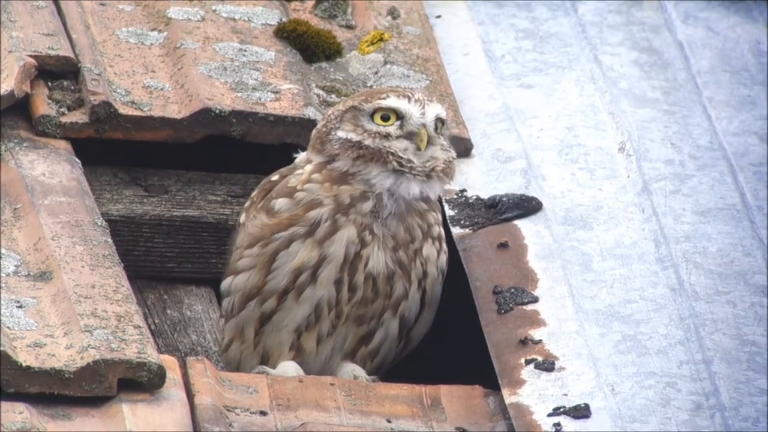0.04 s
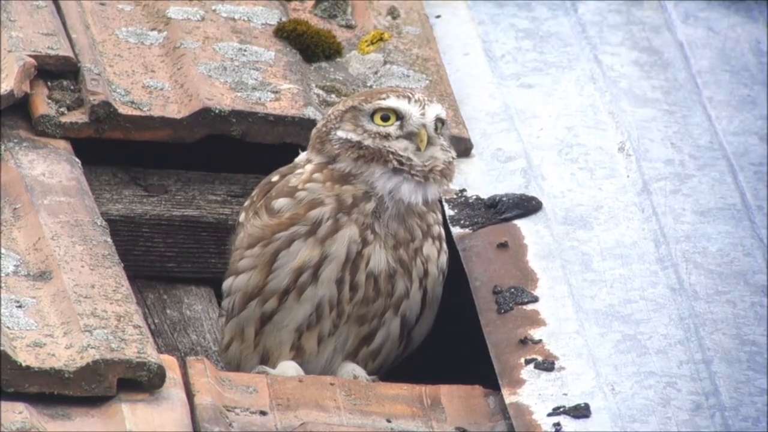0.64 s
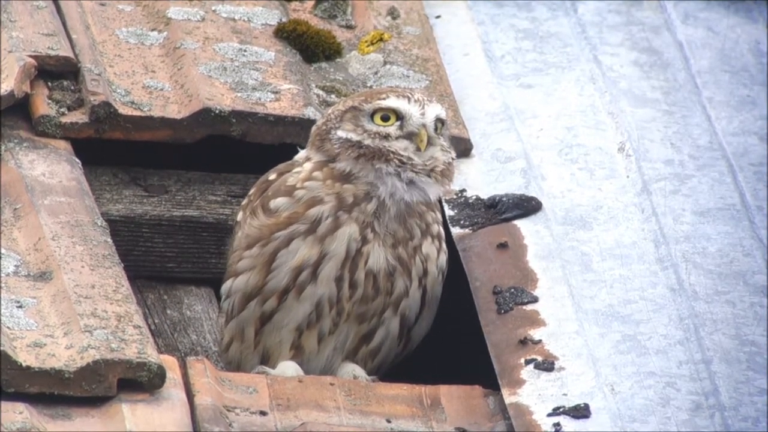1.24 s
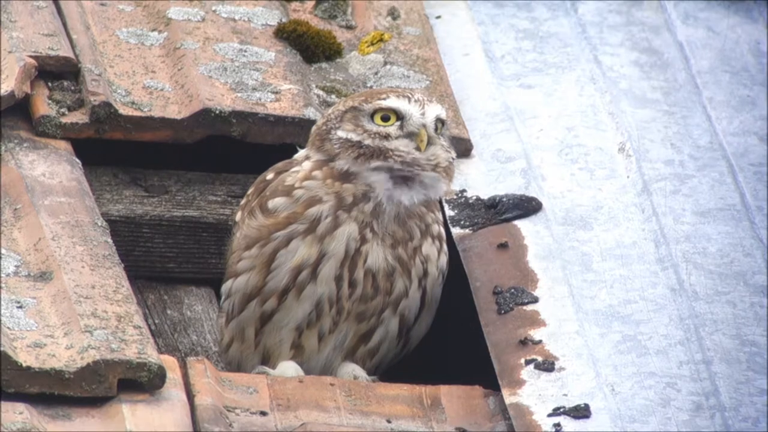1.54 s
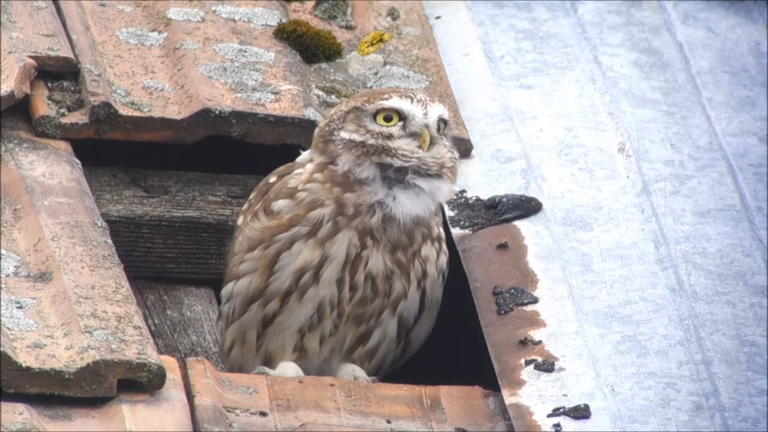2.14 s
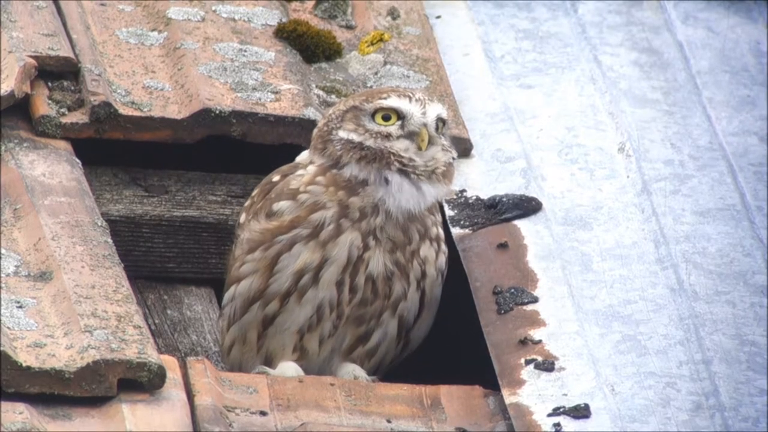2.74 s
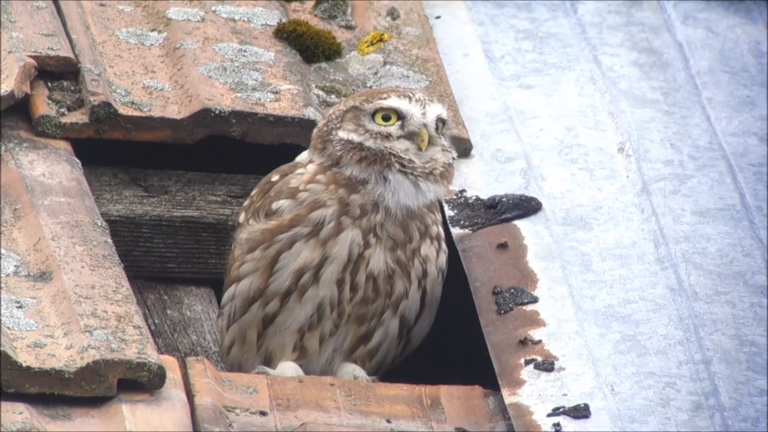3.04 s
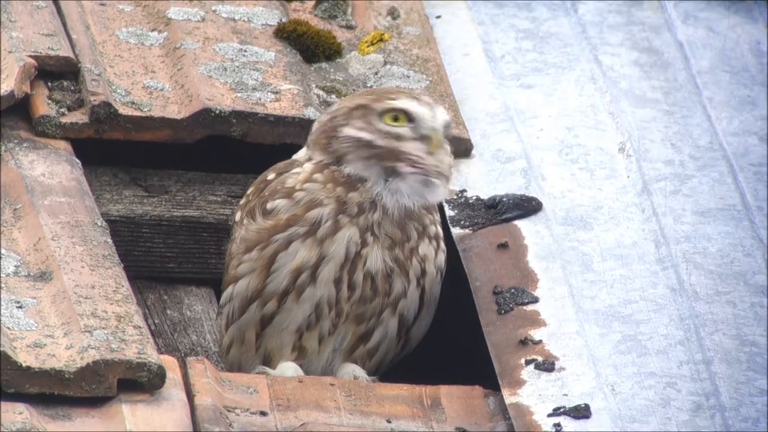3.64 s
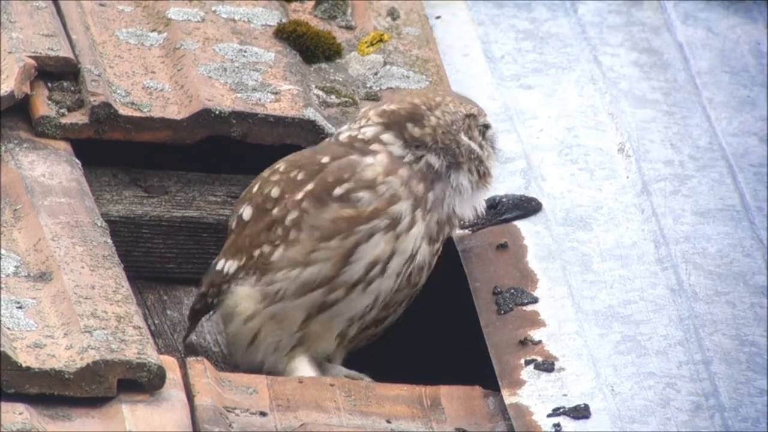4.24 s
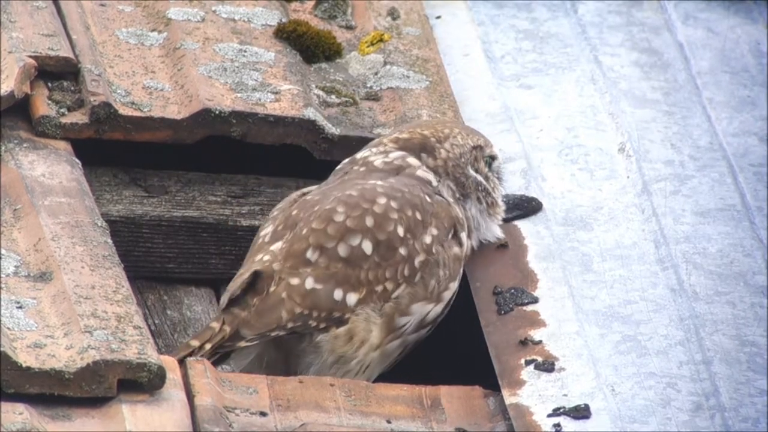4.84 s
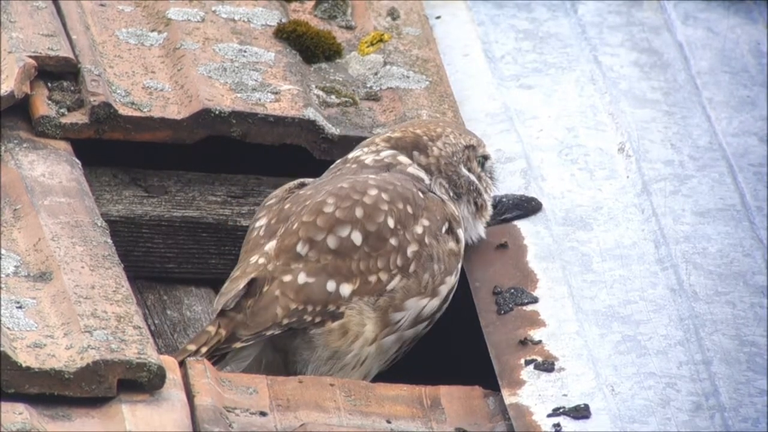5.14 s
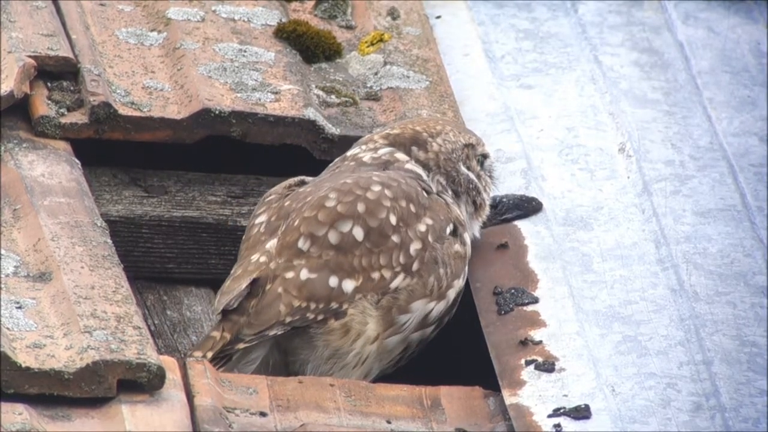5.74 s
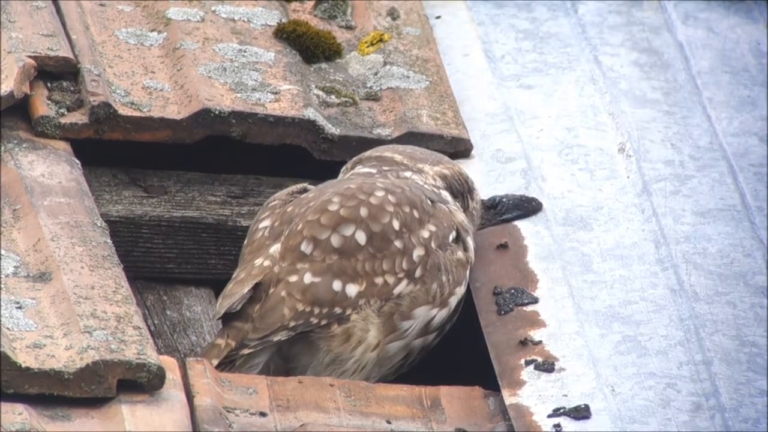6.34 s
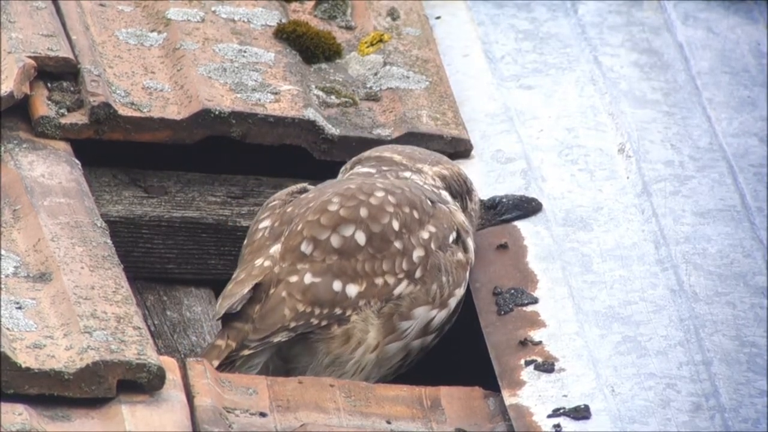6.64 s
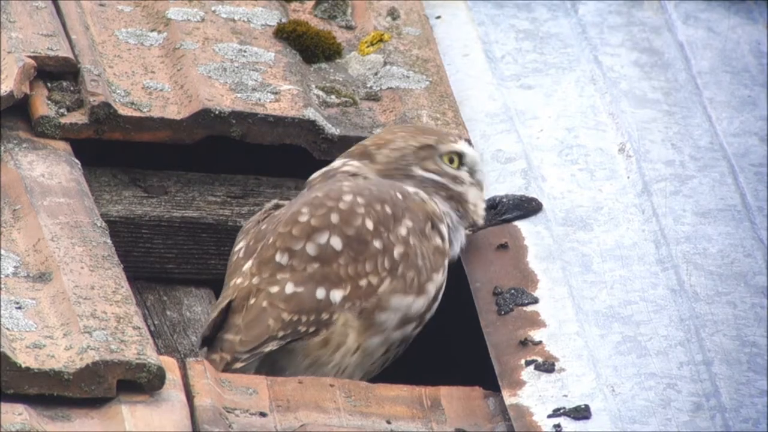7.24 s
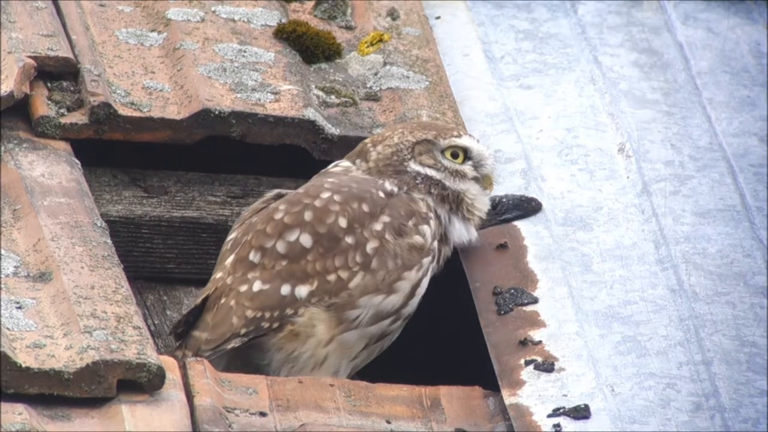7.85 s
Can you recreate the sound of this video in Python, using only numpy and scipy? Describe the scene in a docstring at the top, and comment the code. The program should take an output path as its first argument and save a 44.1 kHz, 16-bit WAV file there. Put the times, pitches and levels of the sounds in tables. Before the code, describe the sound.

Light wind and a soft open-air hiss fill a farmyard, with gusts bumping gently against the stereo microphone. After a brief distant chirp, a nearby little owl hoots three times, a couple of seconds apart, each clear call sliding upward and leaving a short echo. Its feathers rustle faintly during the second and loudest call, and a distant songbird's quick, raspy whistles overlap the third.

```python
"""A farmyard in light wind, heard on a stereo microphone. Close by on a tiled roof, a little owl gives
three drawn-out, rising hoots: nearly pure syrinx tones whose overtones are shaped by its throat and
which echo between the buildings. Farther off, a small songbird chatters in quick, sliding whistles.
Gusts rumble over a steady outdoor hiss, and now and then an eddy buffets the microphone."""
import sys
import numpy as np
from scipy import signal
from scipy.fft import rfft, irfft
from scipy.io import wavfile

SR = 44100
rng = np.random.default_rng(int(sys.argv[2]) if len(sys.argv) > 2 else 0)


def materialize(psi):
    """Save the field psi as 16-bit PCM at rate SR to the path in sys.argv[1].

    A 1-D psi becomes a single channel; in a 2-D psi each row is a channel.
    """
    bounded = np.clip(np.atleast_2d(psi).T, -1, 1)
    quanta = np.round(bounded * 32767).astype(np.int16)
    wavfile.write(sys.argv[1], SR, quanta)


N = 356769


def from_db(db):
    """Decibels to gain."""
    return 10 ** (np.asarray(db) / 20)


def pan(db):
    """Gains that raise the left channel and lower the right by db; negative leans right."""
    return from_db([[db], [-db]])


def rms_one(x):
    """Scale to unit power."""
    return x / np.sqrt(np.mean(x ** 2) + 1e-20)


def in_time(rows):
    """Each column of a curve at every sample."""
    times, *columns = np.transpose(rows)
    return [np.interp(np.arange(N) / SR, times, column) for column in columns]


def at_hz(points, hz):
    """Read a spectrum on a log-frequency axis."""
    known_hz, values = np.transpose(points)
    return np.interp(np.log(hz + 1e-3), np.log(known_hz), values)


def bandpass(x, band_hz, order):
    """Keep the band between two frequencies."""
    return signal.sosfilt(signal.butter(order, band_hz, "band", fs=SR, output="sos"), x)


def drift(rate_hz):
    """Random motion of spread 1, mostly slower than rate_hz."""
    hop, settle = 40, 2000
    pole = np.exp(-2 * np.pi * rate_hz * hop / SR)
    noise = rng.standard_normal(N // hop + settle + 2)
    slow = signal.lfilter([1], [1, -2 * pole, pole * pole], noise)[settle:]
    return np.interp(np.arange(N) / hop, np.arange(len(slow)), rms_one(slow))


def swells(rows):
    """Gain of bell-shaped swells."""
    t = np.arange(N) / SR
    return sum(from_db(db) * np.exp(-(2 * (t - centre) / length) ** 2) for centre, length, db in rows)


def stereo_noise(spectrum):
    """Coloured noise of unit power, alike in both channels in the bass and diffuse in the treble."""
    # likeness of left and right: f/Hz, correlation
    likeness = [(30, 0.99), (70, 1), (170, 0.89), (350, 0.5), (700, 0.38), (1500, 0), (3000, 0), (6000, 0),
                (14000, 0)]
    hz = np.arange(N // 2 + 1) * SR / N
    mid, side = rfft(rng.standard_normal((2, N)))
    alike = np.clip(at_hz(likeness, hz), -1, 1)
    both = np.sqrt(1 + alike) * mid + np.sqrt(1 - alike) * side * [[1], [-1]]
    return rms_one(irfft(both * from_db(at_hz(spectrum, hz)), N))


def hiss(level_db=-56):
    """Steady open-air hiss from all round."""
    # hiss spectrum: f/Hz, relative level/dB
    spectrum = [(250, -10.5), (420, -10.5), (600, -9.5), (730, -6), (900, -11), (1080, -8.5), (1800, -10),
                (2300, -8), (2750, -12.5), (3050, -11), (3500, -13), (8000, -20), (13000, -26.5),
                (15600, -42)]
    return from_db(level_db) * stereo_noise(spectrum)


def wind(rumble_db=-2.0, gust_db=1.84, rush_db=0.5):
    """Low gusts over a deep rumble, a soft rush, and eddies that thud on the microphone."""
    # spectra of the four layers: f/Hz, relative level/dB
    rumble_spectrum = [(20, 3.5), (36, -13), (54, 7.5), (75, 3.5), (110, -7.5), (200, -46)]
    gust_spectrum = [(60, -6), (110, 6.5), (175, 6.5), (240, -1), (330, -26.5)]
    rush_spectrum = [(150, -12), (250, 4.5), (330, -2), (480, -7), (640, -34)]
    eddy_spectrum = [(20, -0.5), (36, -8), (54, 9.5), (75, 2), (110, -11), (200, -37)]
    # wind strength before each layer's gain: t/s, gust level/dB, rush level/dB
    strength = [(0, -63, -67), (.5, -63.5, -67), (1.2, -65.5, -67), (2.4, -67.5, -68), (3.7, -68, -75),
                (4.1, -63, -71), (4.5, -63, -66.5), (4.95, -66.5, -70.5), (5.5, -66, -73.5),
                (5.7, -60.5, -72), (6, -64.5, -65.5), (6.6, -61, -68), (7.05, -67.5, -67), (7.5, -63, -60),
                (8.09, -71, -64)]
    # eddies striking the microphone: t/s, length/s, level/dB
    buffets = [(.18, .12, -65), (.76, .22, -59.5), (1.32, .3, -59.5), (1.62, 0.088, -52),
               (1.77, 0.098, -58), (2.04, 0.17, -58.5), (2.29, 0.23, -54), (5.57, 0.084, -53.5),
               (5.69, 0.12, -59), (5.84, 0.12, -56.5), (6.2, 0.31, -60), (7.14, .1, -57),
               (7.42, 0.089, -62), (7.68, 0.074, -64)]
    gust_curve, rush_curve = in_time(strength)
    rumble = from_db(gust_curve + rumble_db + 2.0 * drift(5)) * stereo_noise(rumble_spectrum)
    gusts = from_db(gust_curve + gust_db + 1.7 * drift(8)) * stereo_noise(gust_spectrum)
    rush = from_db(rush_curve + rush_db) * stereo_noise(rush_spectrum)
    eddies = swells(buffets) * stereo_noise(eddy_spectrum)
    return rumble + gusts + rush + eddies


def yard(x, t60_s=0.76, build_s=0.0013, dull_hz=6000):
    """Diffuse scatter from roofs, walls and trees, different in each channel."""
    t = np.arange(int(1.2 * SR)) / SR
    tail = rng.standard_normal((2, len(t))) * from_db(-60 * t / t60_s) * (1 - np.exp(-t / build_s))
    tail = signal.sosfilt(signal.butter(1, dull_hz, fs=SR, output="sos"), tail)
    tail /= np.sqrt(np.sum(tail ** 2, axis=1, keepdims=True))
    return signal.fftconvolve(x[None], tail, axes=1)[:, :N]


def wall_echo(x):
    """A distinct return from the nearest building."""
    # wall reflection: delay/s, left level/dB, right level/dB
    echoes = [(.047, -24, -23)]
    t = np.arange(N) / SR
    return sum(from_db([[left], [right]]) * np.interp(t - delay, t, x, left=0)
               for delay, left, right in echoes)


def stirred(x, depth=.8, rate_hz=45):
    """Moving air and leaves make the scattered sound flutter, each channel in its own way."""
    flutter = np.array([drift(rate_hz), drift(rate_hz)])
    return x * (1 + depth * flutter) / np.sqrt(1 + depth ** 2)


def fading_hoot(level_db=-61, octave_db=-7, band_hz=(790, 880), t60_s=2.0):
    """At the start, the last scatter of an earlier hoot, fundamental and octave, dies away."""
    tone, octave = (rms_one(bandpass(rng.standard_normal((2, N)), k * np.array(band_hz), order=2))
                    for k in (1, 2))
    decay = from_db(level_db - 60 * np.arange(N) / SR / t60_s)
    return (tone + from_db(octave_db) * octave) * decay


def songbird(rasp=0.0289, flutter_db=3.5, buzz=.5, edge_s=0.003, direct_db=-2.0, yard_db=-2.5):
    """Raspy whistles, each bent through three pitches, far enough off to lie deep in the scatter."""
    # notes: t/s, length/s, first f/Hz, middle f/Hz, last f/Hz, relative level/dB
    notes = [ (0.000, 0.024, 3610, 3950, 4520, -48), (0.004, 0.037, 3210, 3350, 3070, -56),
             (0.021, 0.0347, 3540, 3710, 3620, -48.5), (0.055, 0.022, 3665, 3640, 3660, -58),
             (2.935, 0.023, 4840, 5530, 4600, -61), (2.961, 0.029, 4230, 3750, 3650, -56.5),
             (4.041, 0.033, 5000, 5180, 4100, -59), (4.108, .023, 4020, 4420, 3770, -57.5),
             (4.569, 0.037, 2350, 2175, 1750, -52), (5.374, 0.037, 4280, 4220, 3830, -59),
             (6.999, .018, 6140, 5300, 4350, -56), (7.015, 0.055, 4500, 3670, 5040, -48),
             (7.053, 0.034, 4690, 5550, 5260, -57), (7.072, 0.038, 4520, 3804, 4050, -48),
             (7.087, .022, 5930, 5100, 4400, -56), (7.108, .045, 4184, 3880, 5140, -45.5),
             (7.155, .030, 5460, 4000, 3600, -44.5), (7.193, 0.0196, 5750, 5750, 5200, -53),
             (7.195, .030, 3520, 3700, 4600, -53), (7.281, .025, 5940, 5400, 4270, -51.5),
             (7.311, 0.0376, 3905, 3303, 3460, -43.5), (7.345, .042, 3210, 3500, 4560, -46.5),
             (7.384, 0.018, 4440, 4350, 3900, -50), (7.403, 0.0233, 3655, 3403, 3170, -40),
             (7.437, 0.037, 3420, 3700, 4260, -51), (7.464, .037, 4550, 4030, 3350, -49)]
    song = np.zeros(N)
    wobble = 1 + rasp * drift(290)
    # fast, uneven pulsing spreads a husky fringe around the whistle
    flutter = from_db(flutter_db * drift(110)) * (1 + buzz * drift(450))
    for start, length, first, middle, last, level_db in notes:
        t = np.arange(int(length * SR)) / SR
        at = int(start * SR) + np.arange(len(t))
        bend = np.polyfit([0, .5, 1], [first, middle, last], 2)
        pitch = np.polyval(bend, t / length) * wobble[at]
        swell = np.clip(np.minimum(t, length - t) / edge_s, 0, 1) * flutter[at]
        song[at] += from_db(level_db) * swell * np.sin(2 * np.pi * np.cumsum(pitch) / SR)
    return from_db(direct_db) * pan(-0.3) * song + from_db(yard_db) * yard(song)


def feathers():
    """A soft rustle as the owl turns and shuffles its wings."""
    # wing shuffle: t/s, length/s, level/dB
    shuffles = [(4.62, .1, -58)]
    # rustle spectrum: f/Hz, relative level/dB
    spectrum = [(200, -11), (400, -6), (700, -7), (2100, -3), (6000, -32)]
    return swells(shuffles) * stereo_noise(spectrum)


def throat(resonances, hz):
    """Strength that the owl's throat gives an overtone at this frequency."""
    return sum(from_db(db) / (1 + (2 * (hz - centre) / width) ** 2) for centre, width, db in resonances)


def overtones(resonances, pitch, phase, effort_db, on, flutter_db=1.4, usual_db=-34.5, follow=0.63):
    """Harmonics 3 to 9 light up as they climb through the throat's resonances, and grow with effort."""
    upper = sum(throat(resonances, k * pitch) * from_db(flutter_db * drift(45)[on]) * np.sin(k * phase)
                for k in range(3, 10))
    return upper * from_db(follow * (effort_db - usual_db))


def hoot(contour, resonances, jitter=0.0052, slack_jitter=0.049, shimmer_db=1.0, edge_s=0.0025):
    """A nearly pure syrinx tone that scoops up, climbs slowly and drops off; its overtones beam right."""
    scoop_s, scoop_hz, scoop_fade_db = .054, 299, 12
    drop_s, drop_hz, drop_fade_db = .036, 185, 28.5
    octave_flutter_db, octave_fade_db = 2.8, 11
    reed_db, slack_dull_db = -10, 5
    t = np.arange(N) / SR
    start, end = contour[0][0], contour[-1][0]
    gate = np.clip(np.minimum(t - start + scoop_s, end + drop_s - t) / edge_s, 0, 1)
    on = gate > 0
    # both are 0 through the held part and reach 1 at the hoot's outer ends
    scoop = np.maximum(start - t[on], 0) / scoop_s
    drop = np.maximum(t[on] - end, 0) / drop_s
    held_hz, held_db, octave_db = (curve[on] for curve in in_time(contour))
    pitch = held_hz - scoop_hz * scoop ** 2.2 - drop_hz * drop ** 2.2
    effort_db = held_db - scoop_fade_db * scoop ** 0.84 - drop_fade_db * drop ** 2.8
    # in the slides at both ends the slack membrane vibrates unevenly and turns reedy
    slack = np.minimum(2 * scoop ** 2 + 3 * drop ** 2, 1)
    wobble = 1 + (jitter + slack_jitter * slack) * drift(167)[on]
    phase = 2 * np.pi * np.cumsum(pitch * wobble) / SR
    reed = from_db(octave_db + reed_db) * np.minimum(2 * (scoop + drop), 1) * np.sin(3 * phase)
    tone = from_db(effort_db + shimmer_db * drift(62)[on]) * np.sin(phase)
    faded_octave_db = octave_db - octave_fade_db * (scoop ** 2 + drop)
    octave = from_db(faded_octave_db + octave_flutter_db * drift(25)[on]) * np.sin(2 * phase)
    upper = reed + from_db(-slack_dull_db * slack) * overtones(resonances, pitch, phase, effort_db, on)
    out = np.zeros((2, N))
    out[:, on] = np.sqrt(2) * gate[on] * (pan(-0.27) * tone + pan(-1.5) * octave + pan(-1.6) * upper)
    return out


def owl(gain_db=0.6, yard_db=-18.0, overtone_yard_db=-11.5, beam_hz=(1250, 3000)):
    """Three hoots from the roof; the overtones, aimed away over the yard, return more scatter."""
    # held part of each hoot, levels relative: t/s, f/Hz, tone level/dB, octave level/dB
    contours = [
        [(2.085, 776, -48.5, -52), (2.135, 797.5, -43.5, -56), (2.25, 796.6, -38.5, -56),
         (2.305, 810, -41, -62), (2.37, 816, -37.5, -57), (2.45, 829, -40, -58), (2.54, 841.5, -40, -59.5),
         (2.62, 850.3, -37.5, -48), (2.69, 867, -37, -51)],
        [(4.555, 793.4, -46, -50), (4.62, 800.4, -39, -49.5), (4.735, 811, -35.5, -56), (4.785, 827, -35, -45),
         (4.85, 839.7, -35.5, -44), (4.92, 857, -33.5, -54), (4.98, 877, -31.5, -47), (5.05, 879, -31, -46),
         (5.105, 870, -34.5, -49)],
        [(7.18, 823, -48.5, -60), (7.24, 825, -42, -53), (7.35, 819.4, -38, -52), (7.43, 844, -39.5, -48.5),
         (7.50, 837, -39, -62), (7.61, 847, -37, -58), (7.665, 850, -36.5, -48), (7.745, 879.6, -34, -42),
         (7.775, 873, -35.5, -49)],
    ]
    # throat resonances for each hoot: f/Hz, width/Hz, relative level/dB at the usual effort
    throats = [
        [(2373, 114, -44), (3220, 300, -75), (4260, 240, -51), (4840, 280, -67.5), (7400, 200, -73)],
        [(2405, 140, -47.5), (3400, 640, -74), (4002, 38, -57), (4226, 110, -47.5), (7300, 400, -74)],
        [(2444, 62, -54.5), (2610, 96, -59.5), (4080, 60, -58), (4235, 113, -47), (7630, 240, -66.5)],
    ]
    direct = sum(hoot(contour, resonances) for contour, resonances in zip(contours, throats))
    mid = direct.mean(axis=0)
    beamed = bandpass(mid, beam_hz, order=4)
    scatter = yard(from_db(yard_db) * mid + from_db(overtone_yard_db) * beamed)
    return from_db(gain_db) * (direct + wall_echo(mid) + stirred(scatter))


def scene():
    """The owl near the microphone, the songbird farther off, wind and hiss all round."""
    far_bird = songbird()
    air = pan(0.48) * (wind() + hiss())
    return owl() + feathers() + fading_hoot() + far_bird + air


def record(dry, cutoff_hz=15750):
    """The top of the treble is cut steeply."""
    return signal.sosfilt(signal.ellip(12, .1, 80, cutoff_hz, fs=SR, output="sos"), dry)


dry = scene()
out = record(dry)
materialize(out)
```